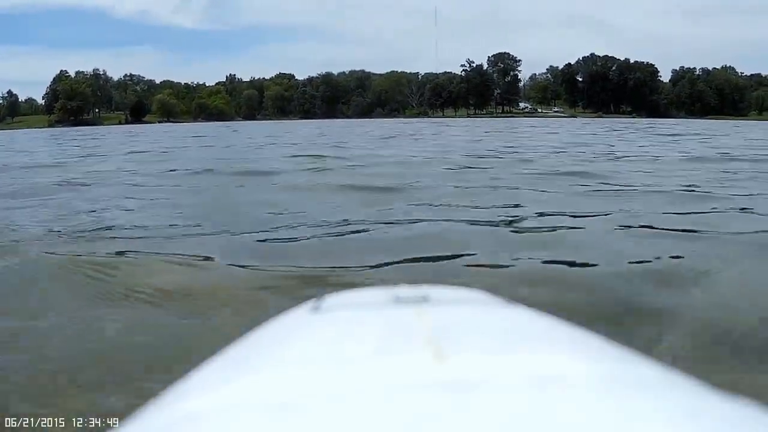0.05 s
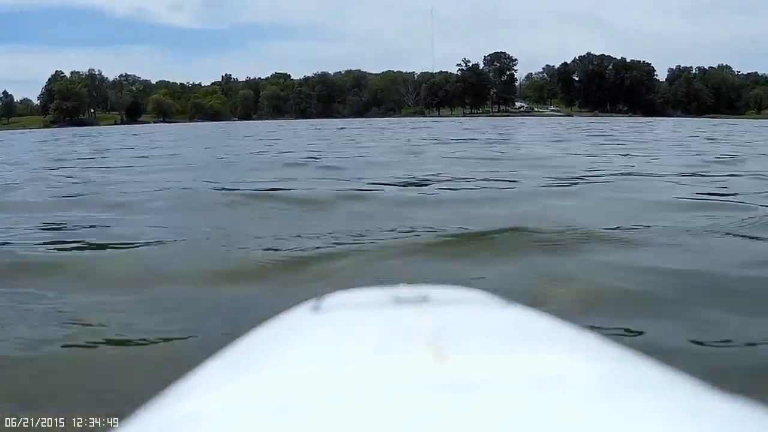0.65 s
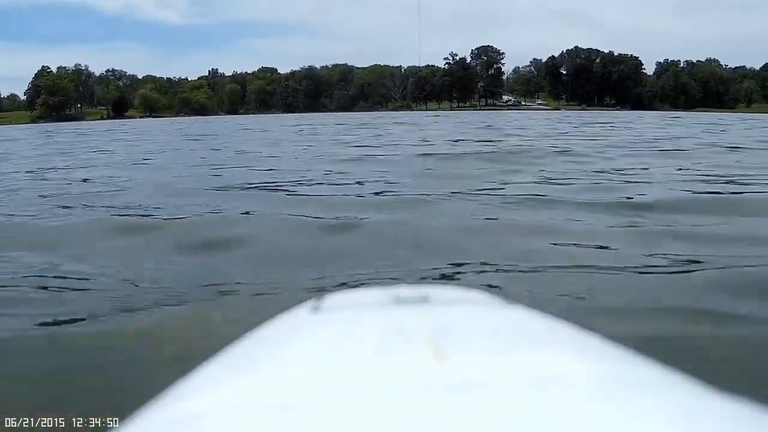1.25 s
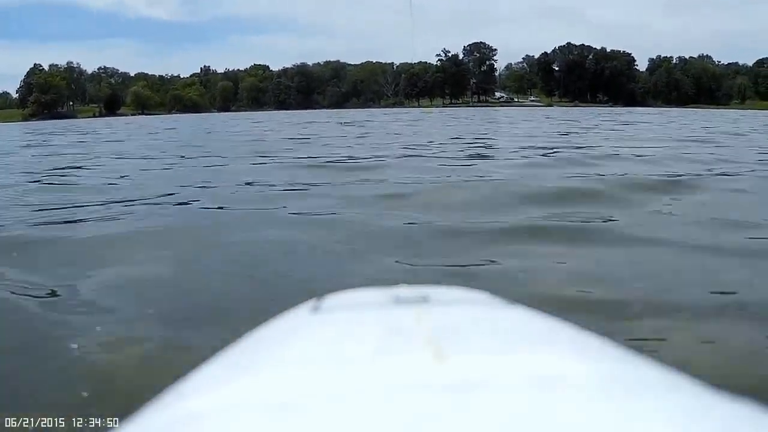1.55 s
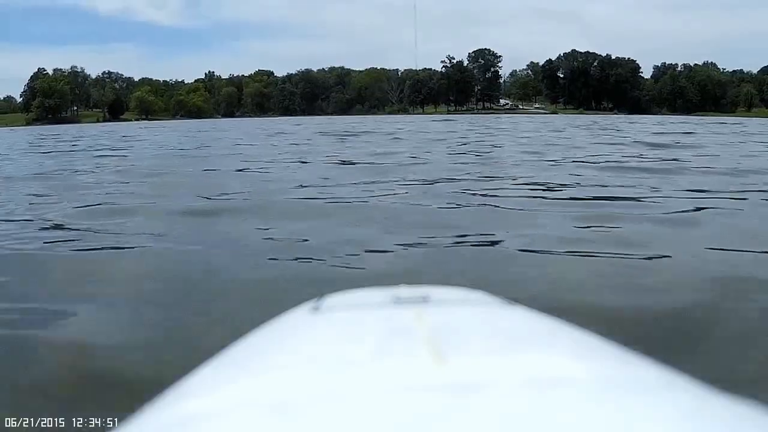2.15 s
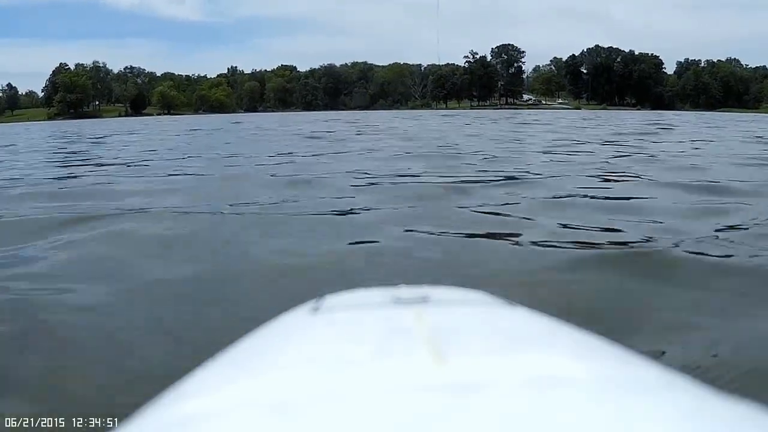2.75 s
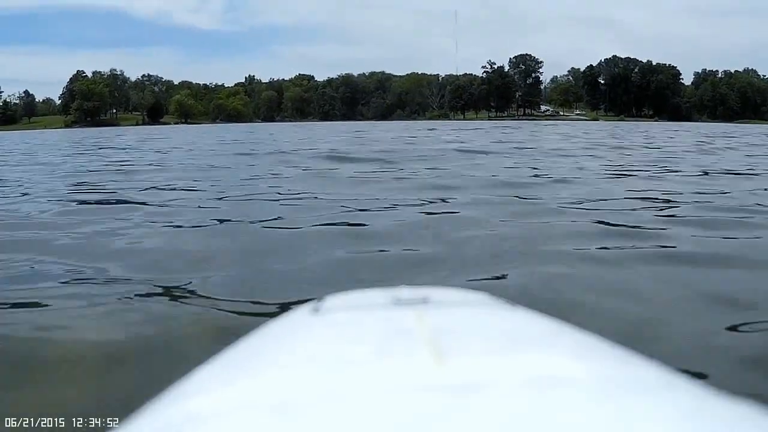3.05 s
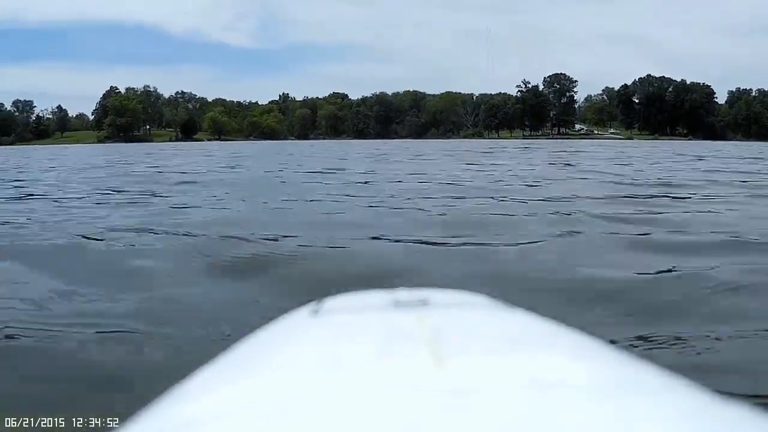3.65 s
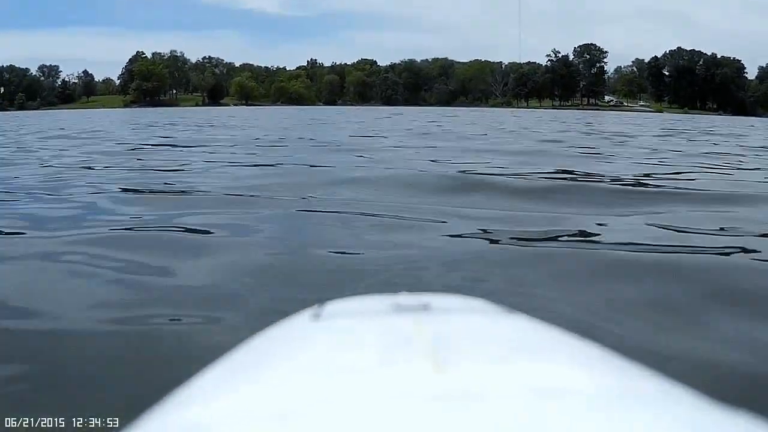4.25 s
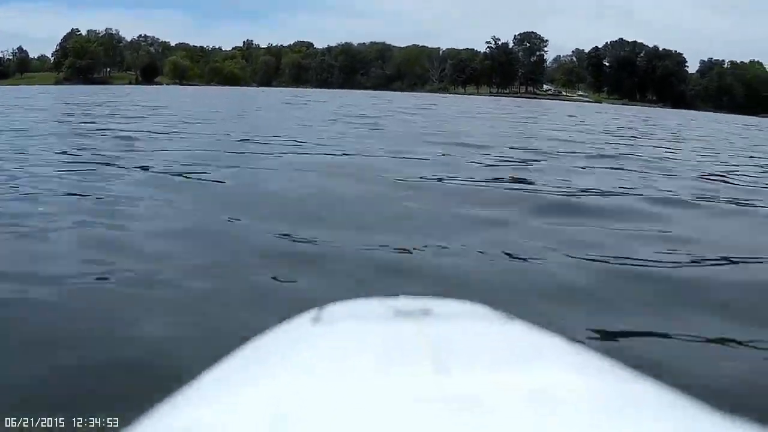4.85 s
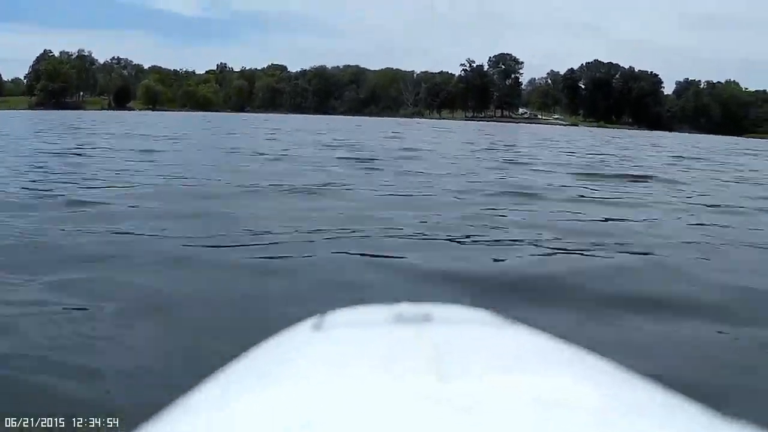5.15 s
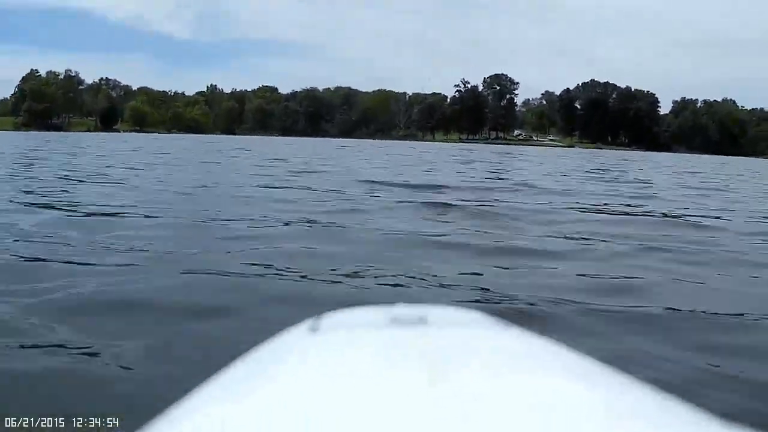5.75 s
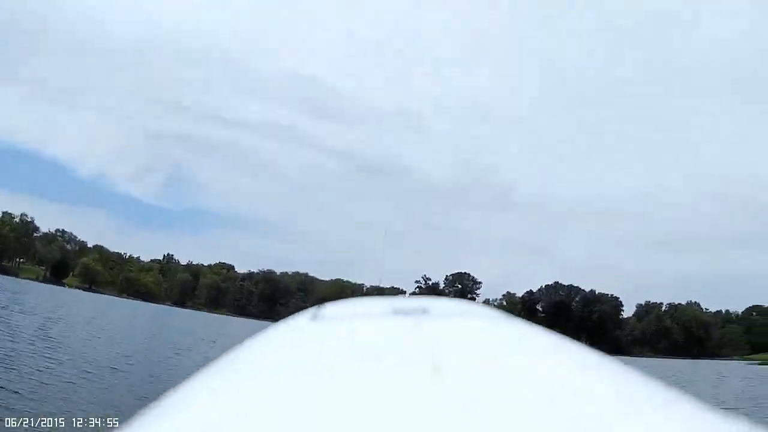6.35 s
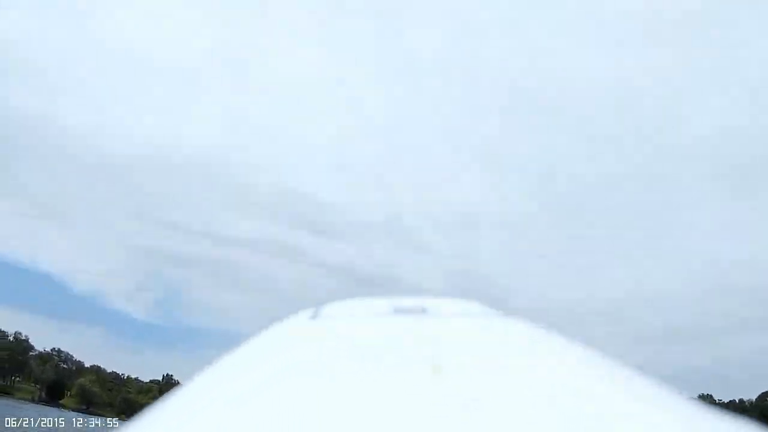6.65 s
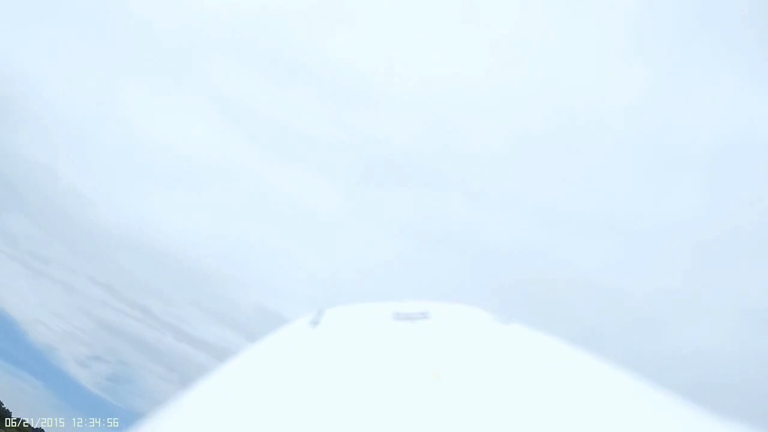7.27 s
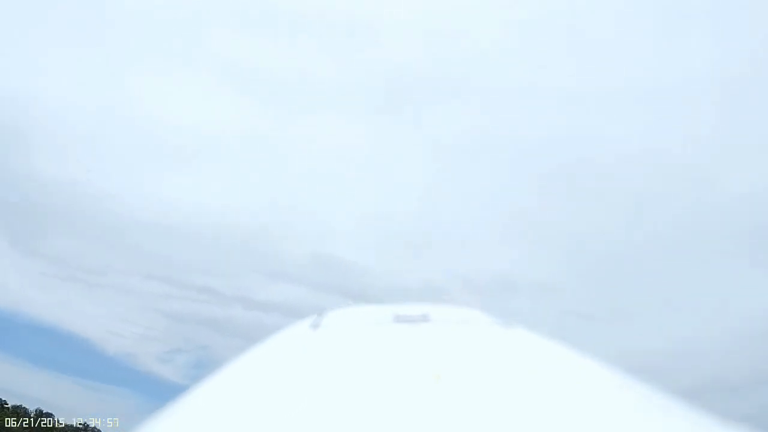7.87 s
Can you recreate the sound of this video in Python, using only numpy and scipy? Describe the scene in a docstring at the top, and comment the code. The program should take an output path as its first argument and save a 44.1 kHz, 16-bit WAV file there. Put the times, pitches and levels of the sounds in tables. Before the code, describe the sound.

Heard from on board a model seaplane on a lake, little splashes tap the hull beneath the shrill, pulsing whistle and rattle of an idling electric motor. The motor then speeds up, its fluttering whine rising steadily in pitch and growing louder. It turns into a strong, steady propeller buzz, and low wind buffets the microphone as the plane lifts off and keeps flying at full power.

```python
"""Ripples slap a hull while an electric model seaplane idles with a high, throbbing whistle and a rattle.
The whistle is its speed controller chopping the current; the rattle is the motor mount.
The throttle opens and the brushless motor's whine climbs. At full speed the two propeller blades
buzz and throw gusts of air, and the wind rumbles as the plane takes off from the lake.
All of it is heard from the hull."""
import sys
import numpy as np
from scipy import signal
from scipy.fft import rfft, irfft
from scipy.io import wavfile
from scipy.ndimage import uniform_filter1d

SR = 44100
rng = np.random.default_rng(int(sys.argv[2]) if len(sys.argv) > 2 else 0)


def store_wav(level_fs):
    """Save 16-bit WAV to argv[1]."""
    pcm = np.round(np.clip(np.atleast_2d(level_fs), -1, 1) * 32767)
    wavfile.write(sys.argv[1], SR, pcm.T.astype(np.int16))


N = 353241
TIME = np.arange(N) / SR
IDLE_HZ, FULL_HZ = 57, 148  # shaft speeds, in turns per second
SWITCH_HZ = 7812.5  # how fast the controller chops the current


def undb(db):
    """Turn decibels into a gain to multiply by."""
    return 10 ** (np.asarray(db) / 20)


def unit(x):
    """Scale a signal to an average strength (rms) of 1."""
    return x / np.sqrt(np.mean(x ** 2))


def tone(cycles):
    """A sine wave of rms 1, from a running count of cycles."""
    return np.sqrt(2) * np.sin(2 * np.pi * cycles)


def curve(table):
    """Join (time, value) points with straight lines."""
    return np.interp(TIME, *np.transpose(table))


def wander(rate_hz):
    """A smooth random drift of rms 1."""
    hold = max(int(SR / rate_hz), 1)
    steps = np.repeat(rng.standard_normal(N // hold + 1), hold)[:N]
    return unit(uniform_filter1d(steps, hold))


def pulses(cycles, width, scatter_db, count=6000):
    """One rounded pulse per cycle, each with its own random strength."""
    offset = (cycles + .5) % 1 - .5
    gains = undb(scatter_db * rng.standard_normal(count))
    return np.exp(-.5 * (offset / width) ** 2) * gains[np.round(cycles).astype(int) % count]


def above(shaft_hz, onset_hz, spread_hz):
    """Rise smoothly from 0 to 1 as the shaft passes a speed."""
    return .5 + .5 * np.tanh((shaft_hz - onset_hz) / spread_hz / 2)


def near(shaft_hz, best_hz, span_hz):
    """Give 1 at one shaft speed, falling away on both sides."""
    return np.exp(-.5 * ((shaft_hz - best_hz) / span_hz) ** 2)


def spectrum_db(points, hz):
    """Look up a level between (frequency, level) points."""
    points_hz, db = np.transpose(points)
    return np.interp(np.log(np.maximum(hz, 1)), np.log(points_hz), db)


def colour(x, points, size=2048):
    """Filter a sound with the given spectrum and scale it to rms 1."""
    bins_hz = np.arange(size // 2 + 1) * SR / size
    cepstrum = irfft(spectrum_db(points, bins_hz) * np.log(10) / 20)
    # folding makes the filter ring only after a hit, never before it
    cepstrum[1:size // 2] *= 2
    cepstrum[size // 2 + 1:] = 0
    ring = irfft(np.exp(rfft(cepstrum)))
    return unit(signal.fftconvolve(x, ring)[:N])


def resonance(x, hz, width_hz):
    """Keep the narrow band of a sound around one ringing pitch."""
    return signal.lfilter(*signal.iirpeak(hz, hz / width_hz, fs=SR), x)


def resonances_db(modes, hz):
    """The level of a tone as its pitch slides through a set of resonances."""
    power = sum((undb(db) / (1 + (2 * (hz - centre) / width) ** 2)) ** 2 for centre, width, db in modes)
    return 10 * np.log10(power)


def thrust_db(shaft_hz, full_db, tenfold_db, airborne_db, lift_off_s=5.43, climb_s=1.8):
    """The propeller gets louder with speed, then bites less hard once off the water."""
    airborne = np.clip((TIME - lift_off_s) / climb_s, 0, 1)
    return full_db + tenfold_db * np.log10(shaft_hz / FULL_HZ) + airborne_db * airborne


# how hard the wind blows: t/s, relative level/dB
WIND_SWELL = [(0, -56), (2.8, -56), (3.1, -47.5), (3.7, -61), (4.7, -38), (6.3, -27), (8, -33.5)]
# the wind's deep tone colour: f/Hz, level/dB
WIND_COLOUR = [(15, -4), (45, -6), (110, -1.5), (230, -2.5), (450, -7.5), (1000, -13), (4000, -40.5)]


def wind(gain_db=7, gust_db=1.3):
    """Rushing air buffets the microphone."""
    level_db = curve(WIND_SWELL) + gain_db + gust_db * wander(24)
    return colour(rng.standard_normal(N), WIND_COLOUR) * undb(level_db)


def fine_hiss(shaft_hz, gain_db=-41):
    """A faint, high hiss swells at part throttle."""
    band = signal.butter(2, [8500, 14000], "bandpass", fs=SR)
    hiss = unit(signal.lfilter(*band, rng.standard_normal(N)))
    return hiss * undb(gain_db + wander(20)) * near(shaft_hz, best_hz=78, span_hz=16)


# ripples hitting the hull: t/s, relative level/dB, starting f/Hz, time to fade by 60 dB/s
RIPPLES = [(.012, 3.5, 1650, 0.011), (.26, -2, 1720, .014), (.74, -11.5, 1280, 0.0084),
           (0.92, -5.5, 1950, 0.0091), (1.076, -9, 1740, .012), (1.09, -7.5, 1830, .012),
           (1.551, 1.5, 1560, 0.014), (1.562, 1, 1900, 0.0078), (1.572, -5, 1600, 0.0087),
           (1.722, -22, 596, 0.024), (2.118, -2, 1730, 0.011), (2.311, -4.5, 1480, 0.013),
           (2.326, -1.5, 1760, 0.0097), (2.955, -13, 1600, .012), (3.767, -16, 1400, .035),
           (3.873, -2.5, 1200, 0.0069), (4.598, -14, 1200, 0.014), (4.851, -9, 547, 0.022),
           (5.078, 0.5, 2030, 0.0075), (5.081, -8, 670, .025), (5.308, -8, 877, 0.018)]


def slaps(rise_s=0.00027, glide=1.2, splash=0.38, gain_db=3):
    """Each ripple traps air that rings with a rising pitch, and throws a few drops."""
    out, t = np.zeros(N + SR), np.arange(SR // 16) / SR
    drop_band = signal.butter(1, [700, 4500], "bandpass", fs=SR)
    for start_s, db, hz, fade_s in RIPPLES:
        ring = np.sin(2 * np.pi * hz * t * (1 + glide * t * t / fade_s))
        drops = signal.lfilter(*drop_band, rng.standard_normal(len(t)))
        envelope = (1 - np.exp(-t / rise_s)) * np.exp(-np.log(1000) * t / fade_s)
        start = int(start_s * SR)
        out[start:start + len(t)] += undb(db + gain_db) * envelope * (ring + splash * drops)
    bass_cut = signal.butter(3, 500, "highpass", fs=SR, output="sos")
    return signal.sosfilt(bass_cut, out[:N])


# how the propeller shakes the hull: cycles per turn, relative level/dB
HULL_SHAKES = [(6, 1.5), (7, -29), (8, -1.5), (10, -9), (11, -11), (12, -7.5)]


def hull_growl(turns, gain_db=-41, waver_db=4):
    """The shaft's overtones pass one by one through a resonance of the hollow hull."""
    shake = sum(undb(db + waver_db * wander(34.76)) * tone(k * turns) for k, db in HULL_SHAKES)
    return undb(gain_db) * resonance(shake, hz=632, width_hz=75)


# tone colour of the air thrown by the blades: f/Hz, level/dB
GUST_COLOUR = [(150, -1), (600, -3), (1100, -4), (1950, 3.5), (2500, -4.5), (3100, -4.5), (4050, 2.5),
               (5050, -5), (5500, -7.5), (7700, -7.5), (8800, -20.5), (10200, -13.5), (11800, -26.5),
               (15500, -36)]


def blade_gusts(turns, shaft_hz, steady=0.2, waver_db=0.75):
    """Each blade throws a short burst of swirling air at the hull, no two alike."""
    bursts = pulses(2 * turns, width=0.037, scatter_db=3)
    air = colour((bursts + steady) * rng.standard_normal(N), GUST_COLOUR)
    level_db = thrust_db(shaft_hz, full_db=-19, tenfold_db=69.5, airborne_db=-2)
    return air * undb(level_db + waver_db * wander(18))


# the rattle's level swells at idle, dips briefly near 1.6 s, then recovers: t/s, relative level/dB
RATTLE_LEVEL = [(0, -1.5), (1.5, 0.8), (1.65, -3.5), (1.9, -1), (2.5, -0.5)]


def rattle_gain(shaft_hz, base_db=-21, tenfold_db=-18, flare_db=5.5, tight_db=-38):
    """The mount rattles most at part throttle; full thrust pulls it tight."""
    loose_db = base_db + tenfold_db * np.log10(shaft_hz / IDLE_HZ) + curve(RATTLE_LEVEL)
    loose_db += flare_db * near(shaft_hz, best_hz=78.2, span_hz=11.5)
    tight = above(shaft_hz, onset_hz=141, spread_hz=2.5)
    return (1 - tight) * undb(loose_db) + tight * undb(tight_db)


# how the mount and hull ring: f/Hz, level/dB
MOUNT_COLOUR = [(480, -32.5), (630, -12.5), (860, -20), (1650, -3.5), (2300, -4), (3200, -10.5), (4100, 2),
                (4550, -5), (4950, -1), (5600, -13.5), (7800, -5.5), (8900, -20), (10200, -15),
                (11800, -35.5), (15500, -25)]


def mount_rattle(turns, shaft_hz, scrape=.38, wear=.6, track_points=512):
    """The mount knocks twice a turn and chatters; the worn bearing's roughness repeats every turn."""
    knocks = pulses(2 * turns + .6, width=.065, scatter_db=2.9)
    chatter = .33 * pulses(6 * turns, width=1 / 8, scatter_db=2.9)
    positions = np.arange(track_points) / track_points
    bearing = np.interp(turns, positions, rng.standard_normal(track_points), period=1)
    grit = rng.standard_normal(N) + wear * unit(bearing)
    return colour((knocks + chatter + scrape) * grit, MOUNT_COLOUR) * rattle_gain(shaft_hz)


# how well the bell, the motor's spinning shell, gives off each pitch: f/Hz, level/dB
BELL_COLOUR = [(1300, -24), (2000, -5), (2300, -12), (2650, -9), (3300, -20), (3850, -6), (4200, -4),
               (4700, -6), (5170, -2), (5450, -21), (5900, -11), (6600, -16), (7500, -30), (10200, -26),
               (11200, -45)]
# weaker magnet pulls on the bell: cycles per turn, relative level/dB, shaft speed of strongest pull/Hz
BELL_PULLS = [(20.93, -1.5, 92), (28, -12, 78), (56, 1, 95), (58.3, -5, 92), (63, 3, 69), (70, -2, 76)]


def bell_whistles(turns, shaft_hz, gain_db=-23, span_hz=6, throb=0.53):
    """At part throttle the magnets shake the bell: rising whistles flare as they cross its resonances."""
    whistles = np.zeros(N)
    for k, db, best_hz in BELL_PULLS:
        level_db = db + spectrum_db(BELL_COLOUR, k * shaft_hz) + 2 * wander(110)
        whistles += near(shaft_hz, best_hz, span_hz) * undb(level_db) * tone(k * turns)
    return undb(gain_db) * whistles * (1 + throb * np.sin(4 * np.pi * turns))


# tones on either side of the chopping pitch: extra cycles per turn, relative level/dB
SIDE_TONES = [(-20, -26), (-10, -13), (-4, -2), (-1, -3), (0, 0), (1, -2), (4, -2), (6, -11), (10, -16),
              (14, -18), (20, -32)]


def chopping_song(turns, shaft_hz, odd_fall_db=1, smear=-.0135, steady_share=0.61):
    """The chopped current sings in throbs, twice a turn, which partly merge into a whistle at speed."""
    k = np.arange(-20, 21)
    odd = k % 2
    side_db = np.interp(k, *np.transpose(SIDE_TONES)) - odd_fall_db * np.abs(k) * odd
    # the side tones add up to the shape of one turn; smear spreads each throb a little in time
    positions = np.linspace(0, 1, 512)
    side_cycles = np.outer(positions, k) + smear * k ** 2 + odd / 4
    one_turn = np.exp(2j * np.pi * side_cycles) @ undb(side_db)
    throb = np.interp((turns + 0.323) % 1, positions, one_turn) * undb(1.47 * wander(130))
    steady = steady_share * above(shaft_hz, onset_hz=90, spread_hz=7.8)
    envelope = (1 - steady) * throb + steady * np.abs(one_turn).mean()
    phase = 2 * np.pi * SWITCH_HZ * TIME + 0.068 * wander(220)
    return unit(np.real(envelope * np.exp(1j * phase)))


# tones made by chopping and coil switching together: cycles per chop, extra cycles per turn, level/dB
BEAT_TONES = [(1, -64, -6), (1, -63, 0), (1, -42, -1), (1, -28, -6), (1, -21, -3), (1, 42, -3),
              (2, -140, -9), (2, -168, -9)]


def chopping_beats(turns, shaft_hz, throb=0.083):
    """Most of these tones fall as the motor speeds up; they flare at the bell's resonances."""
    beats = np.zeros(N)
    for per_chop, per_turn, db in BEAT_TONES:
        hz = per_chop * SWITCH_HZ + per_turn * shaft_hz
        level_db = db + spectrum_db(BELL_COLOUR, hz) + wander(120)
        beats += undb(level_db) * tone(per_chop * SWITCH_HZ * TIME + per_turn * turns)
    low_cut = signal.butter(6, 3500, "highpass", fs=SR, output="sos")
    return signal.sosfilt(low_cut, beats) * (1 + throb * np.sin(4 * np.pi * turns + wander(40)))


def controller(turns, shaft_hz, base_db=-22, fall_db_per_hz=0.09, flare_db=7):
    """The speed controller chops hardest at part throttle; its sound dies away at full throttle."""
    level_db = base_db - fall_db_per_hz * (shaft_hz - IDLE_HZ)
    level_db += flare_db * near(shaft_hz, best_hz=83.2, span_hz=13.7)
    chopping = 1 - above(shaft_hz, onset_hz=143, spread_hz=3)
    song = undb(-0.05) * chopping_song(turns, shaft_hz)
    beats = undb(0.16) * chopping_beats(turns, shaft_hz)
    octave = undb(-28) * (IDLE_HZ / shaft_hz) ** 3 * tone(2 * SWITCH_HZ * TIME)
    return undb(level_db) * chopping * (song + beats + octave)


# resonances that the whine climbs through: f/Hz, width/Hz, level/dB
WHINE_RESONANCES = [(2638, 297, -17), (3330, 130, -24), (3980, 300, -15.5), (4200, 440, -13),
                    (5130, 1130, -23), (5854, 220, -23), (6334, 230, -28)]


def motor_whine(turns, shaft_hz, idle_flutter=0.12, peak_flutter=0.69, lock=0.78, free_db=-23):
    """The coils switch 42 times a turn and whine; the rotor runs unevenly, so the whine flutters."""
    level_db = resonances_db(WHINE_RESONANCES, 42 * shaft_hz)
    # most flutter comes midway through the run-up, less where the whine locks onto a resonance
    uneven = idle_flutter + (peak_flutter - idle_flutter) * near(shaft_hz, best_hz=116, span_hz=22.3)
    flutter = np.minimum(uneven * undb(lock * (free_db - level_db)), 1.3)
    angle = 2 * np.pi * turns
    sway = 1.74 * np.sin(angle) + 0.32 * np.sin(2 * angle) + 0.36 * np.sin(4 * angle) + .15 * wander(250)
    load = 1 + 1.04 * flutter * np.cos(2 * angle)
    whine = load * tone(42 * turns + flutter * sway / (2 * np.pi))
    bell_ring = 1.45 * resonance(whine, hz=5070, width_hz=100)
    return (whine + bell_ring) * undb(level_db + wander(90))


# tones of the magnets' hum: cycles per turn, relative level/dB
HUM_TONES = [(12, -17), (13, -10), (14, 0), (15, -15), (16, -17), (21, -20), (28, -18)]
# resonances that the hum climbs through: f/Hz, width/Hz, level/dB
HUM_RESONANCES = [(791, 60, -43), (996, 82, -27.5), (1114, 144, -22.5), (1238, 160, -21.5),
                  (1477, 110, -28), (1860, 190, -29), (2102, 147, -29)]


def magnet_hum(turns, shaft_hz, tug_db=-30, fall_from_hz=67, fall_db_per_hz=.42):
    """The 14 magnets hum as they turn; their 84 small tugs a turn add a high tone that fades at speed."""
    hum = sum(undb(db + wander(25)) * tone(k * turns) for k, db in HUM_TONES)
    hum_db = resonances_db(HUM_RESONANCES, 14 * shaft_hz)
    fall_db = fall_db_per_hz * np.maximum(shaft_hz - fall_from_hz, 0)
    tugs = tone(84 * turns) * undb(tug_db - fall_db + wander(70))
    return hum * undb(hum_db) + tugs


# overtones that make the blades buzz: cycles per turn, relative level/dB
BUZZ_TONES = [(3, -2), (4, -1.5), (6, 5.5), (8, 4), (10, 1), (12, 1.5), (16, -16), (18, -10)]


def propeller(turns, shaft_hz, buzz_floor_db=-50, jitter_turns=0.0032):
    """Two blades pass the hull: the pressure falls slowly, then rises sharply, which makes the buzz."""
    buzz_db = thrust_db(shaft_hz, full_db=-20, tenfold_db=97, airborne_db=-1.4)
    buzz_gain = np.hypot(undb(buzz_db), undb(buzz_floor_db))
    shaky_turns = turns + jitter_turns * wander(200) * buzz_gain / buzz_gain.max()
    buzz = unit(sum(undb(db) * tone(k * shaky_turns) for k, db in BUZZ_TONES))
    drone = tone(2 * turns - 1 / 4) + undb(-15.5) * tone(4 * turns)
    drone_db = thrust_db(shaft_hz, full_db=-13.5, tenfold_db=39.3, airborne_db=-3.1)
    drone *= undb(drone_db + 0.35 * wander(40))
    # being off balance, the propeller shakes the plane once a turn, mostly at high speed
    shake_gain = undb(-60) + undb(-28) * above(shaft_hz, onset_hz=112, spread_hz=6)
    shake = tone(turns) * shake_gain * undb(2.6 * wander(30))
    return drone + shake + buzz * buzz_gain * undb(wander(60))


# turns per second of the propeller shaft, from idle to take-off: t/s, f/Hz
SHAFT_SPEED = [(0.0, 57.16), (0.62, 56.85), (2.49, 57.01), (2.61, 59.83), (2.83, 71.35), (3.21, 81.66),
               (3.47, 92.17), (3.82, 102.46), (4.16, 116.48), (4.34, 122.54), (4.62, 137.1), (4.8, 141.65),
               (5.2, 144.98), (5.72, 146.44), (6.34, 149.89), (6.67, 152.05), (7.72, 147.54), (8.0, 146.97)]


def scene():
    """One shaft drives every sound of the plane; wind, hiss and ripples join them in one channel."""
    shaft_hz = curve(SHAFT_SPEED)
    turns = np.cumsum(shaft_hz) / SR
    sources = (propeller, motor_whine, magnet_hum, bell_whistles, controller, mount_rattle, blade_gusts)
    plane = sum(source(turns, shaft_hz) for source in sources)
    return (plane + hull_growl(turns) + wind() + fine_hiss(shaft_hz) + slaps())[None]


def record(dry, ceiling=.76, top_hz=15750):
    """Round off the loudest peaks and cut the highest treble."""
    rounded = dry / (1 + (dry / ceiling) ** 8) ** (1 / 8)
    return signal.sosfilt(signal.ellip(10, .2, 80, top_hz, fs=SR, output="sos"), rounded)


dry = scene()
out = record(dry)
store_wav(out)
```